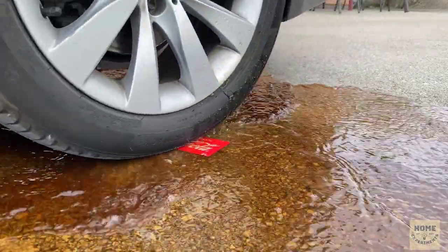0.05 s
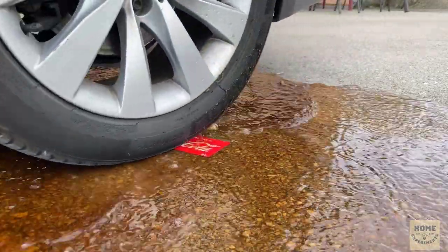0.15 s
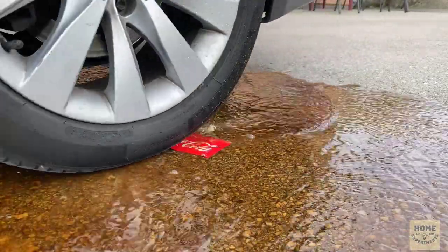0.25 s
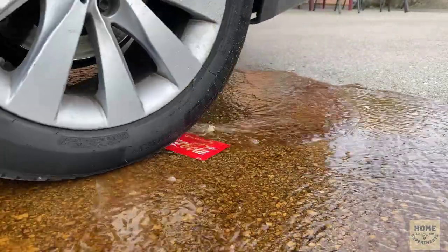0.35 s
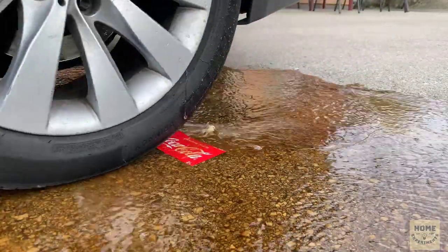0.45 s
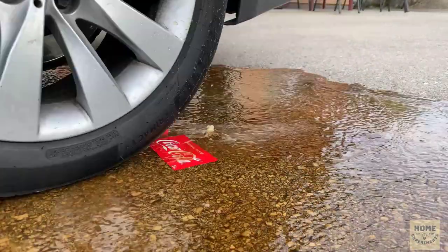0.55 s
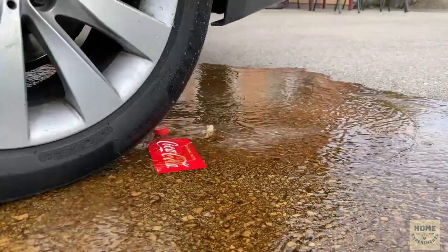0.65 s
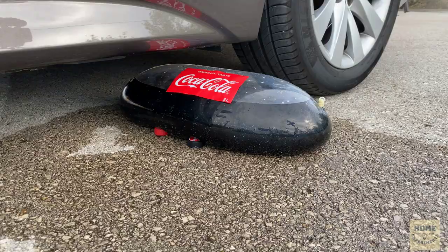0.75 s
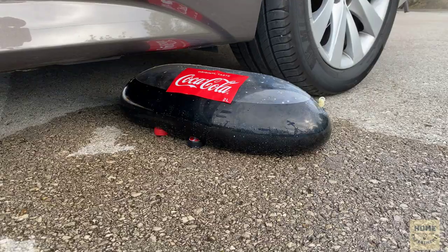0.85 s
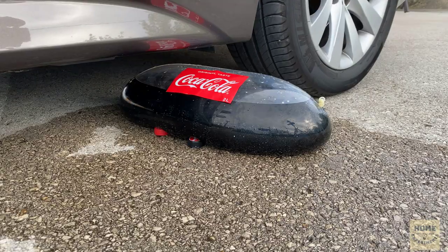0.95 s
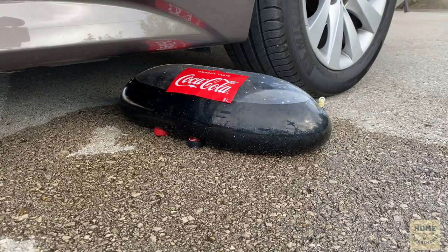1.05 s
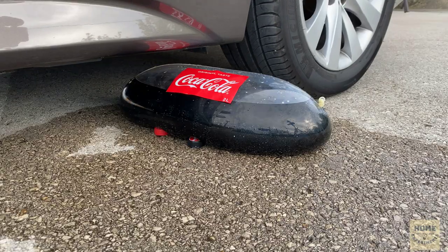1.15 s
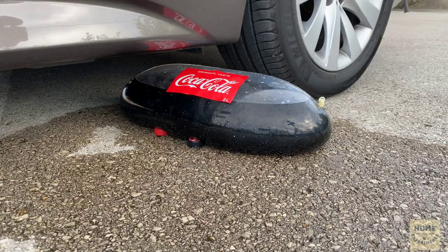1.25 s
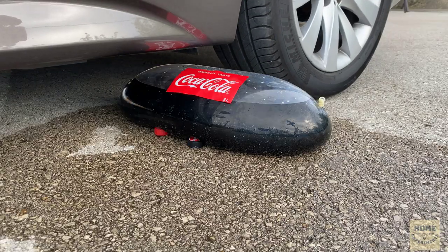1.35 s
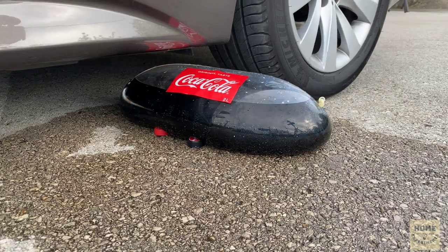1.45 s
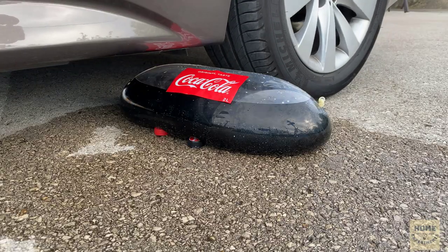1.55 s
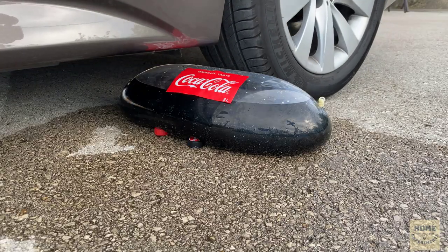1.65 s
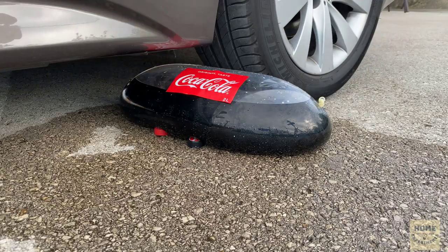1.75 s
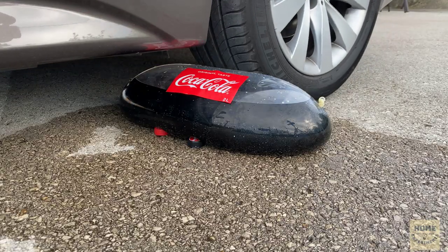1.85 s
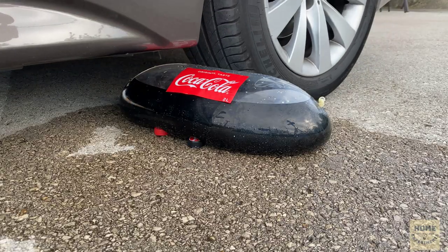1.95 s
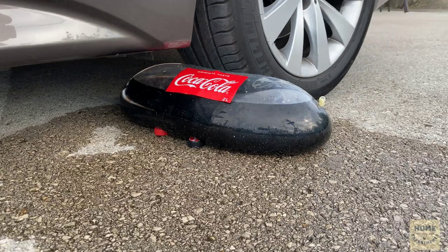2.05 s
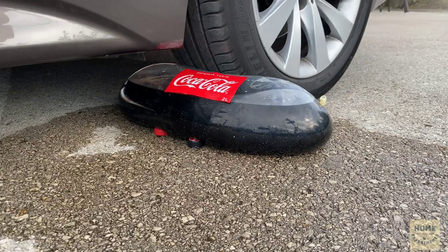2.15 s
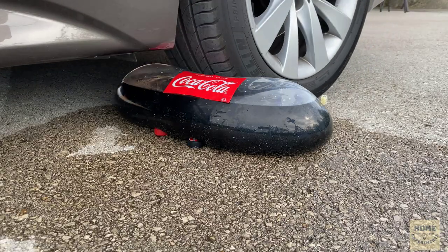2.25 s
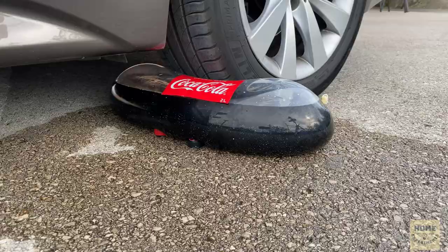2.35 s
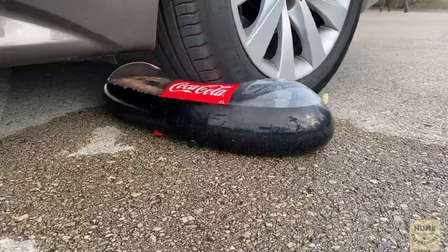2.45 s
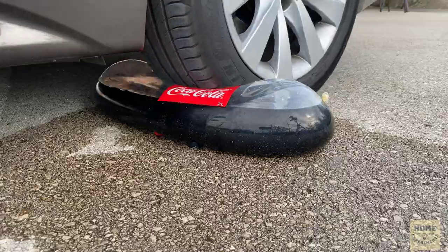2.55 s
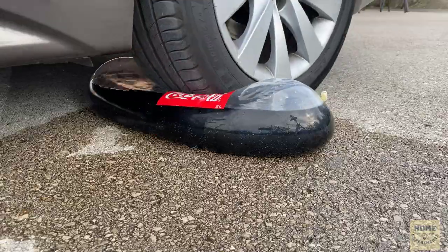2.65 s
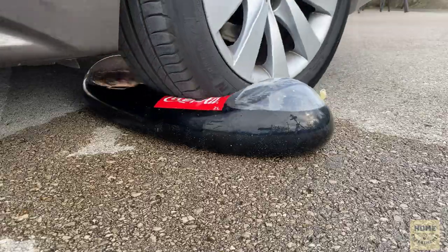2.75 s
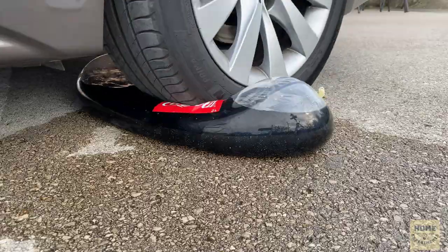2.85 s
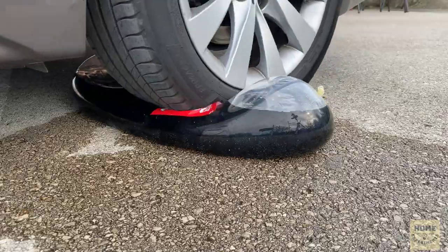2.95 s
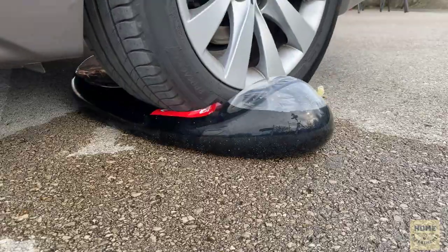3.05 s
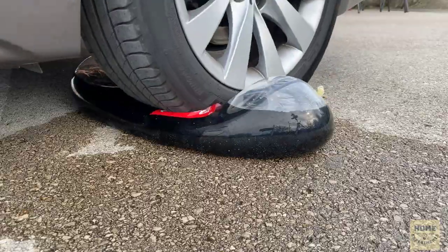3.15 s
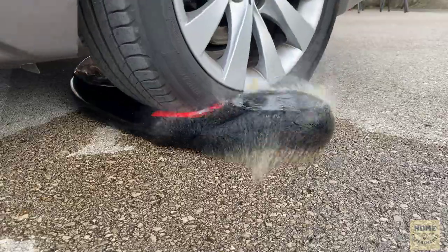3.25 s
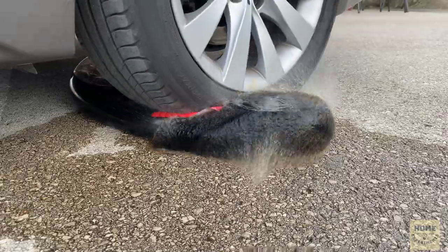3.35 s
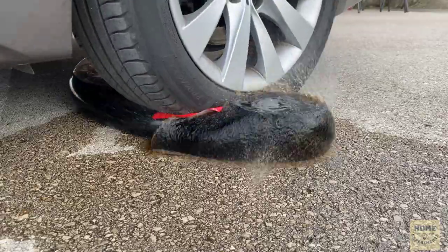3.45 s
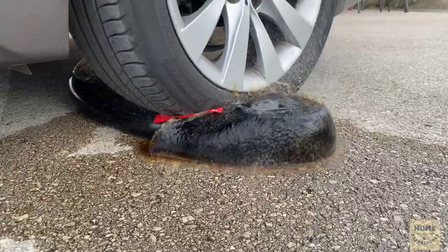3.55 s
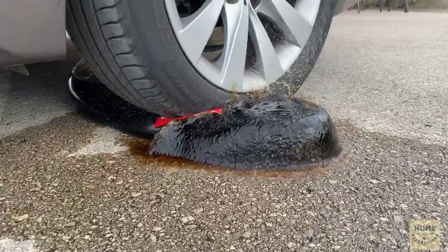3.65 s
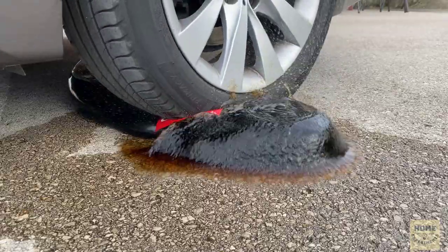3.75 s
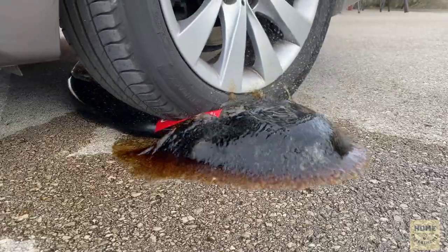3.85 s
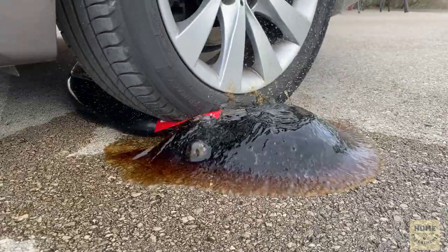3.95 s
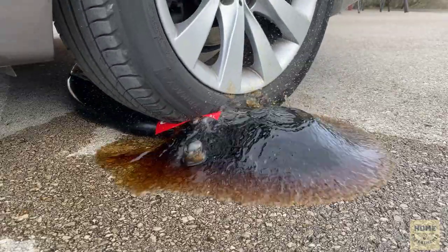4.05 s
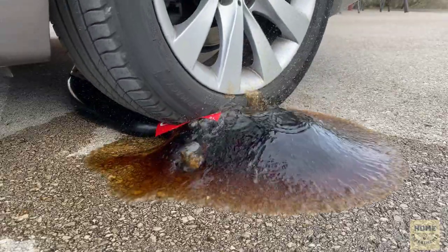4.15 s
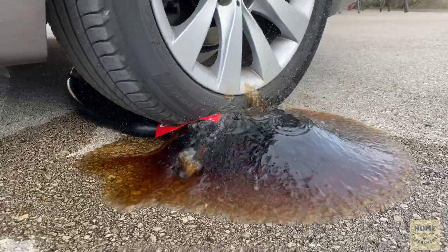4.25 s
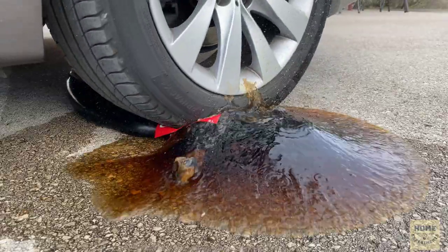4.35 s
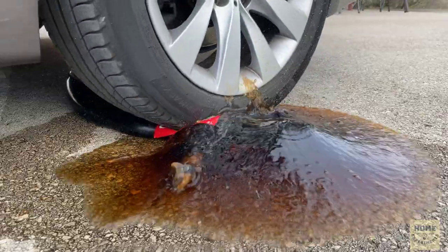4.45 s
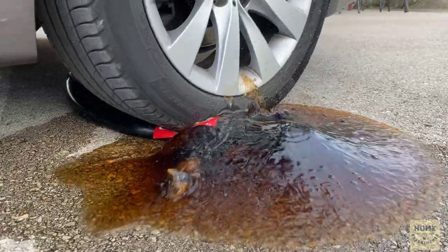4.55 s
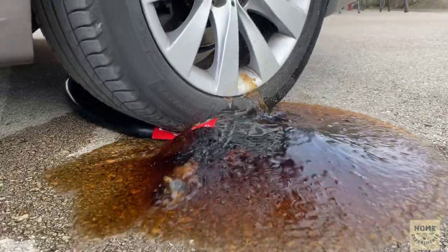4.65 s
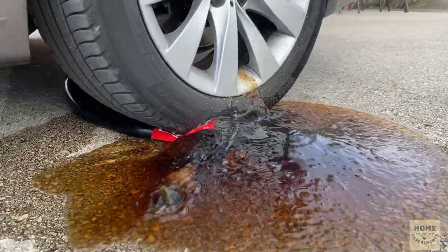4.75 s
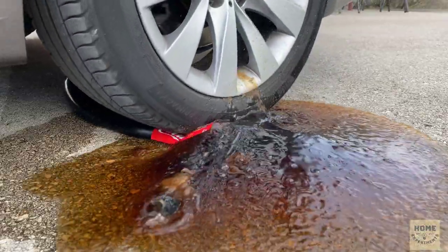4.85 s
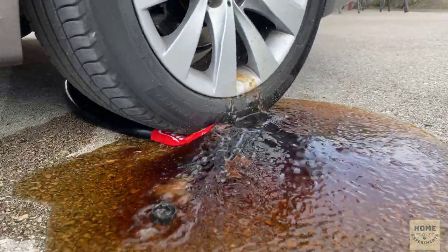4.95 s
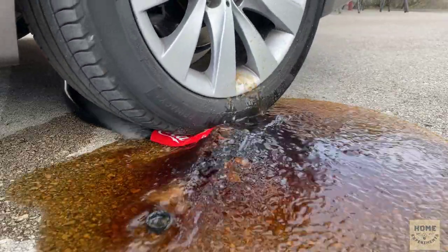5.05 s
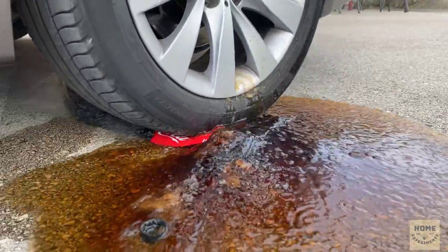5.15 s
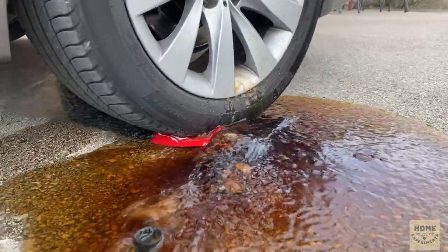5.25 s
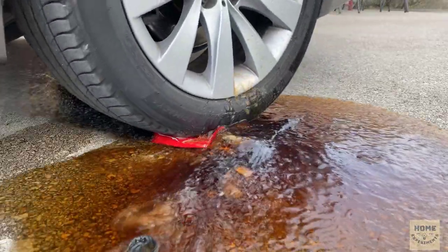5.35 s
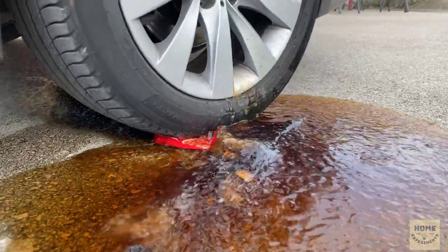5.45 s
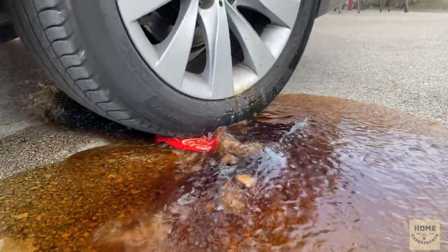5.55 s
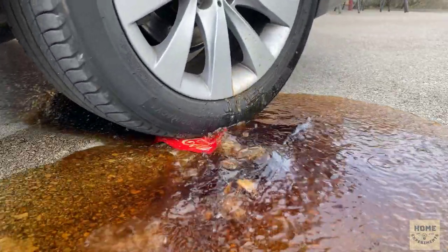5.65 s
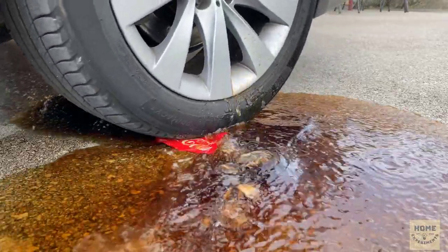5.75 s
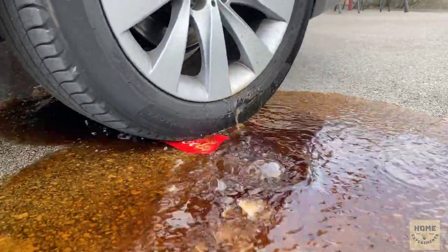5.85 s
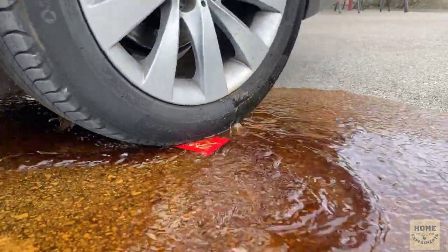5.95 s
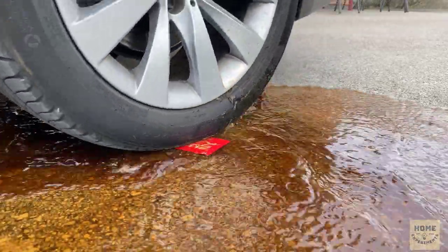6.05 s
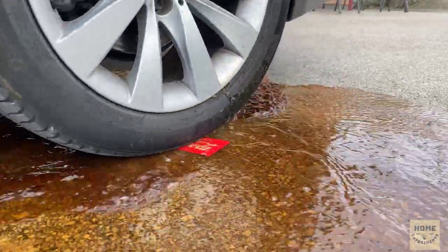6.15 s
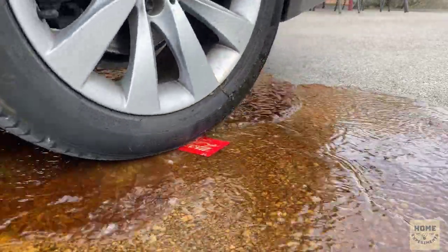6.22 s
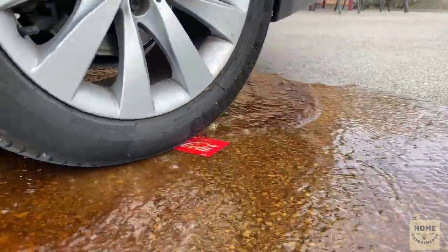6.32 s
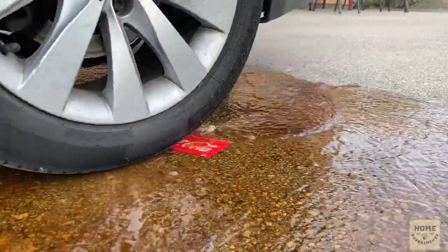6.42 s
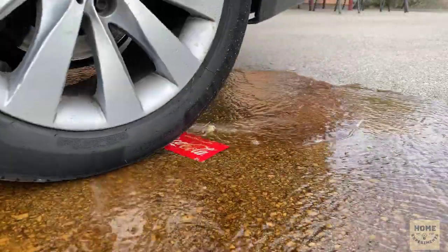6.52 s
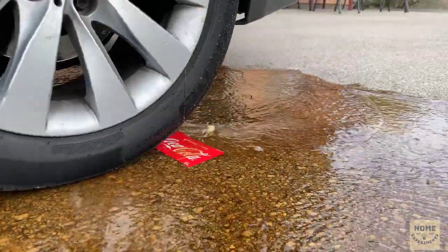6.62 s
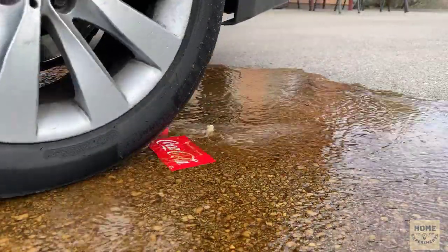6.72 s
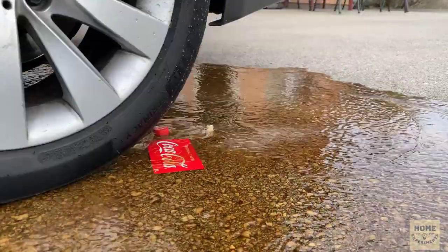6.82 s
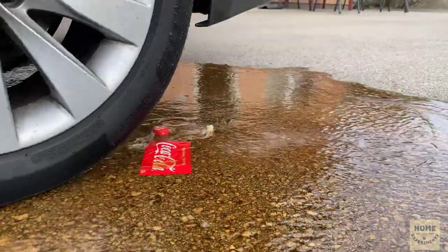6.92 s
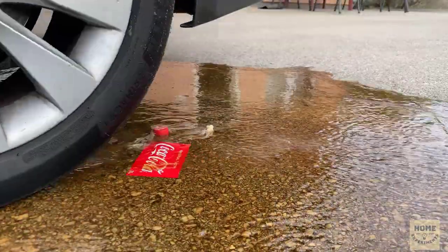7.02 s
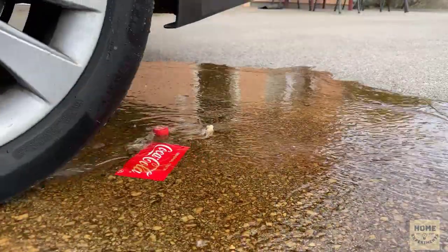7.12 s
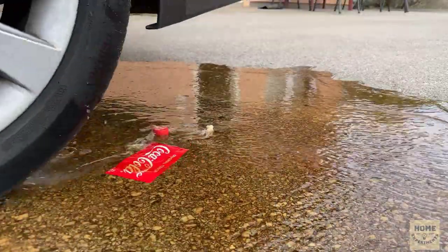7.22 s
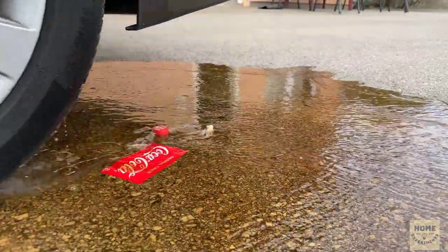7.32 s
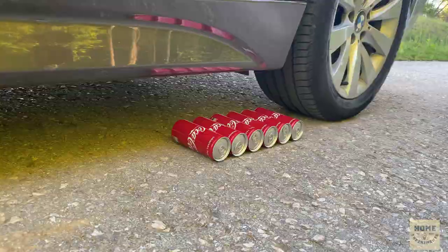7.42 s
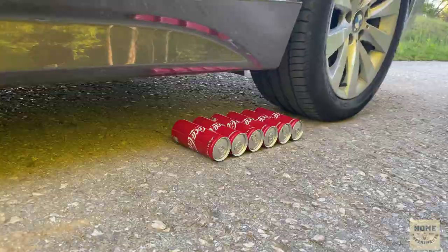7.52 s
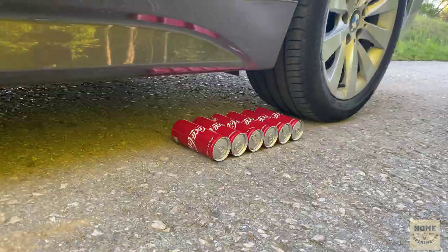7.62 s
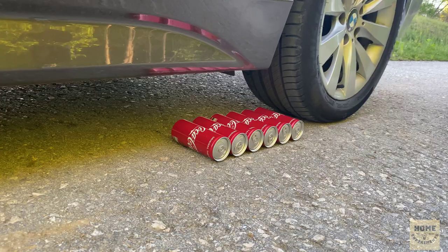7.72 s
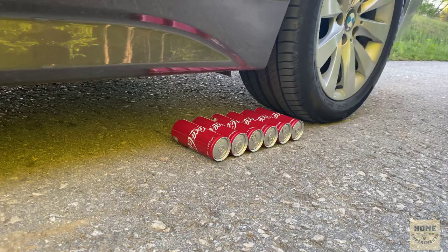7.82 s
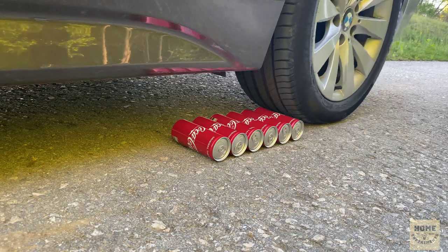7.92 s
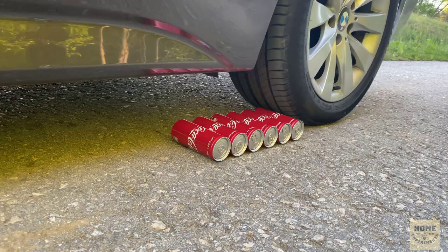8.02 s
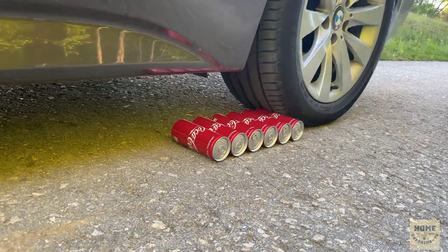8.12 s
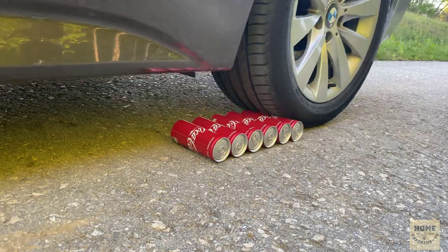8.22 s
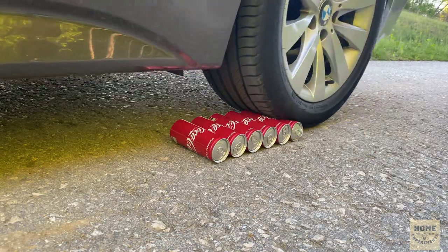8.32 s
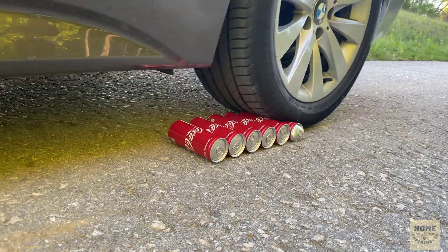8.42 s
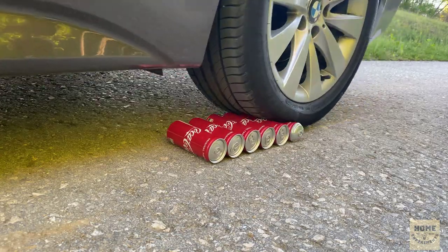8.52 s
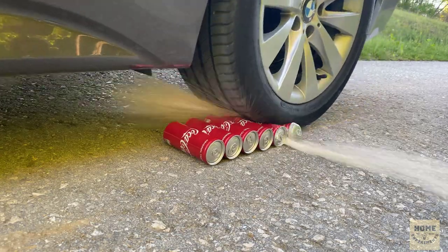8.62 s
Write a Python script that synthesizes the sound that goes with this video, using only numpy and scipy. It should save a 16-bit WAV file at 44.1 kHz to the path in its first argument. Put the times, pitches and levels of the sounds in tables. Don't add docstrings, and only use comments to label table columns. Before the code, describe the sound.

From 0 to 0.78 s a splash thins out, dense watery patter with a few clear plips, in mono, then a tiny silence. From 0.8 s a wide, quiet yard: faint wind, a distant pulsing insect, a far vehicle drone near 1.7 s, and sparse grit ticks, growing sharper as the tyre creeps closer. Rubber creaks softly around 2.7 s. At 3.1 s the liquid-filled balloon bursts with a hard bang and thump; at 3.37 s a second, softer burst releases a gurgling, spattering gush. It thins to scattered drips over tyre hiss and faint car whines. At 5.89 s the gush starts again and dies away similarly. At 7.45 s it cuts to mono low road rumble; a small scrape at 7.95 s, dull knocks from 8.03 s, then thin metal cans buckle from 8.2 s to the end in loud, bright, irregular crunching cracks.

```python
import sys
import numpy as np
from scipy import signal
from scipy.fft import rfft, irfft, next_fast_len
from scipy.io import wavfile
from scipy.ndimage import uniform_filter1d

SR = 44100
rng = np.random.default_rng(int(sys.argv[2]) if len(sys.argv) > 2 else 0)


def master_out(mix):
    frames = np.transpose(np.atleast_2d(mix))
    ceiling = np.clip(frames, -1, 1)
    pcm = np.round(ceiling * 32767).astype(np.int16)
    wavfile.write(sys.argv[1], SR, pcm)


def gain_from_db(level_db):
    decades = np.asarray(level_db, float) / 20
    return 10 ** decades


N = 382788

# start in seconds, end in seconds.
SHOTS = [
    (0, .8),
    (.79, 5.9),
    (7.4, 8.7),
]
# start in seconds, peak level in dB, strongest ring in Hz,
# level of the 400-900 Hz boom in dB.
FOLDS = [(8.1867, -23, 1270, -0.5), (8.2143, -6.5, 2900, -22), (8.2224, -4.5, 3150, -22),
         (8.2368, -10, 3100, -30), (8.2439, -7, 3460, -38), (8.2528, -2, 2960, -31), (8.2614, 0, 2400, -20),
         (8.267, -14, 2990, -12), (8.272, -13, 3000, -23), (8.276, -1.5, 3030, -7.5),
         (8.282, -23, 3100, -16), (8.288, -17, 3080, 3), (8.313, -2.5, 3170, -19.5), (8.399, 4, 2440, -8.5),
         (8.4606, -3, 1540, -7), (8.5033, -30, 2760, -7), (8.5132, -12, 2980, -20), (8.519, -25, 1640, -13),
         (8.5237, -14.5, 3400, -24), (8.5282, -18, 1240, -21), (8.555, -28, 3500, -10),
         (8.5728, -14, 3100, -25), (8.613, -22, 1900, -22), (8.6167, -14, 2740, -2.5),
         (8.6225, -12.5, 2070, -2.5), (8.6254, -17, 3830, -18), (8.6311, -21, 1360, 7.5),
         (8.6517, -11.5, 1400, 4), (8.6714, -19, 2800, -11)]
STEADY_DB = 0.5


def bursts():
    # frequency in Hz, density in dB per Hz.
    blast_tone = [(59, -12), (100, -19), (711, -11.5), (1020, -21.5), (1700, -16.5), (2150, -16.5),
                  (4170, -8.5), (5280, -18), (10000, -17), (12100, -25), (14400, -18), (16300, -41)]
    # peak time in seconds, rms level in dB, rise in seconds, t60 in seconds,
    # slosh level in dB.
    tears = [
        (3.0959, -9, 0.00058, 0.013, -34),
        (3.099, -25, 0.00039, 0.058, -31.5),
        (3.1034, -24, 0.00034, 0.01, -38),
        (3.354, -40, 0.00091, 0.21, -32.5),
        (3.3715, -23, 0.0036, 0.017, -34),
        (3.377, -13.5, 0.0043, 0.06, -14),
    ]
    refill = [(12150, 430, 30), (16200, 900, 30)]
    left, right = noise(blast_tone, SHOTS[1], STEADY_DB, size=256, bumps=refill)
    side = 1.11 * (left - right)
    blast = evened(stereo_treble(left + right + side * np.c_[[1, -1]]))
    slosh = evened(band(blast + 0.6 * blast.mean(0), 64, 1510))
    out = np.zeros((2, N))
    for s, db, rise, t60, slosh_db in tears:
        out += (gain_from_db(db) * blast + gain_from_db(slosh_db) * slosh) * swell(s, rise, t60)
        thump = gain_from_db(12 + 1.9 * db) * ring(460, 0.044, end_hz=87)
        add(out, s + 0.00126, -thump)
    return out


def fold(db, hz, boom_db, treble_db, t60):
    # frequency in Hz, level in dB, t60 in seconds.
    modes = [(1211, -20, 0.26), (1760, -11, 0.1), (2186, 14, 0.55), (2675, -20, 0.1), (3100, 8, 0.18),
             (3170, -51, 0.12), (3684, 30, 0.11), (4040, 11, 0.057), (4150, -33, 0.083), (4900, -30, 0.077)]
    n, snap_s, contact = 9000, 0.0004, 0.3
    t = np.arange(n) / SR
    slips = gain_from_db(2.2 * evened(uniform_filter1d(rng.standard_normal(n), 30)))
    fall = gain_from_db(-60 * t / (0.32 * t60)) + 0.096 * gain_from_db(-60 * t / (1.93 * t60))
    crack = rng.standard_normal(n) * slips * fall * np.minimum(t / snap_s, 1)
    wall = np.zeros(n)
    chance = rng.standard_normal((4 * len(modes), 2))
    for (f, mode_db, mode_t60), (detune, spread) in zip(4 * modes, chance):
        mode = ring(f * (1 + 0.068 * detune), contact * mode_t60)
        add(wall, 0, gain_from_db(mode_db + 7.7 * spread) * mode)
    parts = [(0.25, signal.oaconvolve(crack[:80], wall)[:n]),
             (0.4, resonate(crack, hz, 920)),
             (0.7, band(crack, 0.41 * hz, 8700)),
             (gain_from_db(boom_db), resonate(crack * fall, 763, 670)),
             (gain_from_db(treble_db), band(crack, 6900, 15700))]
    return gain_from_db(db) * sum(gain * part / abs(part).max() for gain, part in parts)


def folds():
    out = np.zeros(N)
    for s, db, hz, boom_db in FOLDS:
        treble_db = -9 - 10 * (s - FOLDS[0][0])
        add(out, s, fold(db, hz, boom_db, treble_db, t60=0.057))
    return out


def crinkle():
    # peak time in seconds, level in dB, build-up in seconds.
    yields = [
        (8.063, -43, .004),
        (8.159, -61, 0.018),
        (8.225, -48, 0.0073),
        (8.281, -17, 0.02),
        (8.415, -24, 0.0024),
        (8.52, -23.5, 0.0026),
        (8.62, -17, 0.0043),
        (8.68, -32, 0.0077),
    ]
    snaps = rng.standard_normal(N) * gain_from_db(4 * np.minimum(rng.exponential(1, N), 3.5))
    snaps *= rng.random(N) < 8000 / SR
    folding = np.arange(N) > FOLDS[0][0] * SR
    rung = evened(band(snaps, 1250, 4000) + 0.18 * band(snaps, 3400, 19200) * folding)
    return rung * sum(gain_from_db(db) * swell(s, rise, t60=0.055) for s, db, rise in yields)


def knock(hz, t60, rough):
    clean = ring(hz, t60)
    n = np.arange(len(clean))
    rise = 1 - np.exp(-n / SR / 0.00051)
    fuzz = evened(resonate(rng.standard_normal(SR), hz, 1.22 * hz))[-len(clean):]
    smear = 1.5 * fuzz * gain_from_db(-60 * n / len(clean))
    return rise * ((1 - rough) * clean + rough * smear)


def can_knocks():
    # start in seconds, peak level in dB, frequency in Hz.
    thuds = [(8.032, -21.5, 142), (8.062, -31.5, 888), (8.087, -10.5, 237.8), (8.153, -32.5, 1480),
             (8.275, -11, 241.4), (8.277, -14, 1044), (8.398, -16.5, 226), (8.3982, -7, 804),
             (8.462, -11, 264), (8.556, -29, 750), (8.613, -14, 267), (8.615, -14.5, 789), (8.65, -11, 754),
             (8.651, -12.5, 1443), (8.4, -32, 7870), (8.46, -30, 5830), (8.3983, -12.5, 412)]
    # start in seconds, peak level in dB, frequency in Hz, t60 in seconds.
    free_walls = [
        (8.1, -32, 235, 0.25),
        (8.214, -27.5, 1225, 0.31),
        (8.3, -34, 1211, .4),
        (8.318, -26.5, 2186, 0.1),
        (8.41, -31.5, 439.5, .9),
    ]
    out = np.zeros(N)
    for s, db, hz in thuds:
        add(out, s, gain_from_db(db) * knock(hz, 0.035 + 8 / hz, rough=min(hz / 2800, 1)))
    for s, db, hz, t60 in free_walls:
        add(out, s, gain_from_db(db) * knock(hz, t60, rough=0.22))
    return out


def can_friction():
    # time in seconds, level in dB, frequency in Hz.
    cavity = [(8.031, -35.5, 175), (8.066, -38.5, 196), (8.11, -30, 242), (8.15, -36, 244),
              (8.19, -40, 281), (8.216, -49, 278), (8.3, -34, 234), (8.34, -45, 198), (8.389, -63, 220),
              (8.41, -35, 230), (8.45, -35, 216), (8.5, -39, 215), (8.535, -33.5, 270), (8.545, -32.5, 229),
              (8.56, -34, 240), (8.6, -32.5, 209), (8.66, -37, 290), (8.68, -41, 300)]
    # time in seconds, level in dB, frequency in Hz.
    scrape = [(7.943, -57, 520), (7.95, -37.5, 557), (7.965, -41, 510), (7.99, -53, 450), (8.0, -58, 450)]
    # time in seconds, level in dB, frequency in Hz.
    creak = [(8.028, -62, 1200), (8.035, -46, 1200), (8.055, -49, 1100), (8.063, -39, 850),
             (8.08, -49, 700), (8.1, -46, 700), (8.14, -56, 900), (8.156, -42, 1560), (8.175, -40, 1100),
             (8.19, -42, 1190), (8.215, -45, 1290)]
    return hum(cavity, 116) + hum(scrape, 290) + hum(creak, 1200)


def bubble(hz, end_hz, length):
    u = np.arange(int(length * SR)) / (length * SR)
    wobble = evened(uniform_filter1d(rng.standard_normal((2, 4000)), 120))[:, :len(u)]
    pitch = (hz + (end_hz - hz) * u ** 1.23) * (1 + 0.08 * wobble[0])
    loudness = np.sin(np.pi * u ** 0.46) * (1 + 0.42 * wobble[1])
    return loudness * np.sin(2 * np.pi * np.cumsum(pitch) / SR)


def bubbles():
    # start in seconds, peak level in dB, start frequency in Hz,
    # end frequency in Hz, length in seconds.
    cavities = [(2.9, -64, 305, 790, 0.044), (3.192, -51, 440, 1150, .04), (3.307, -41, 413, 660, 0.058),
                (3.417, -32.5, 276, 480, 0.032), (3.439, -35, 456, 477, 0.043),
                (3.448, -29.5, 106, 156, 0.075), (3.455, -35.5, 750, 920, 0.035),
                (3.497, -42, 214.6, 406, 0.064), (3.518, -33, 442, 1400, 0.0357),
                (3.668, -44, 530, 493, 0.037), (3.613, -44, 850, 650, 0.033),
                (3.64, -42.5, 950, 1010, 0.05), (3.3, -31, 1260, 1800, 0.0075),
                (3.541, -30, 1300, 2300, 0.013), (3.505, -39.5, 307, 472, 0.0496),
                (3.47, -38, 710, 1200, 0.036), (0.43, -52, 600, 1250, 0.021),
                (0.045, -46, 626, 1300, 0.036), (0.463, -43, 420, 402, 0.043),
                (0.00607, -44, 840, 1700, 0.084)]
    # start in seconds, peak level in dB, frequency in Hz.
    pops = [(3.26, -45, 670), (3.549, -27, 1850), (3.548, -29.5, 890), (3.582, -35, 1066),
            (3.614, -39, 1080), (3.644, -39, 1150), (3.775, -44, 820), (3.9, -38.5, 1127),
            (3.941, -37, 1940)]
    out, froth = np.zeros((2, N))
    for s, db, hz, end_hz, length in cavities:
        add(out, s, gain_from_db(db) * bubble(hz, end_hz, length))
    for s, db, hz in pops:
        add(out, s, gain_from_db(db) * bubble(hz, 1.15 * hz, 0.011))
        add(out, s, tick(db - 2, 1.56 * hz, cycles=3, puff=2.7, wide=2))
    for when, pitch, glide, loud in rng.random((340, 4)):
        hz = 280 * (1 + 1.51 * when) * 5 ** pitch
        small = bubble(hz, hz * (1 + 0.63 * glide), 12.1 / hz)
        add(froth, 2.7 + 0.93 * when, gain_from_db(-14 * loud) * small)
    return out + gain_from_db(2) * spray_level() * froth


def spray_level():
    # time in seconds, level in dB.
    flows = [
        [(3.11, -44.5), (3.16, -62), (3.24, -56.5), (3.27, -52), (3.35, -46)],
        [(3.4, -41.5), (3.46, -48.5), (3.53, -44.5), (3.58, -50), (3.68, -47), (3.73, -52.5), (3.97, -57),
         (4.4, -66.5)],
    ]
    return level(flows[0]) + level(flows[1])


def spray():
    # frequency in Hz, density in dB per Hz.
    spray_tone = [(150, -41), (400, -7), (1000, 14), (2000, 3), (3400, 13), (5000, 9.5), (8000, 2.5),
                  (15500, -1.5)]
    wash = noise(spray_tone, SHOTS[1], patchy_db=2.4, grain_db=2, size=256)
    drops = np.array([droplets((3.1, 4.4), count=520) for port in "LR"])
    return spray_level() * (gain_from_db(3.5) * wash + gain_from_db(-8.5) * drops)


def droplets(span, count):
    out = np.zeros(N)
    for when, pitch, loud, cycles in rng.random((count, 4)):
        hz = 2300 * 2.7 ** pitch
        drop = bubble(hz, 1.116 * hz, (3 + 14 * cycles ** 2) / hz)
        s = span[0] + (span[1] - span[0]) * when ** 2
        add(out, s, (loud + 0.0087) ** -0.45 * drop)
    return evened(out)


def landing_drops():
    # start in seconds, peak level in dB, frequency in Hz.
    landings = [(3.217, -43, 6200), (3.2575, -38, 4600), (3.3139, -34, 2930), (3.3378, -46, 3350),
                (3.4417, -38, 4720), (3.4715, -38, 3730), (3.4712, -31, 9800), (3.531, -27.5, 3800),
                (3.537, -41, 3320), (3.571, -45, 5000), (3.6068, -30, 4210), (3.6205, -50, 3250),
                (3.652, -37, 3100), (3.6694, -40, 7000), (3.6812, -29, 3860), (3.74, -39, 5240),
                (3.7966, -39, 6360), (3.8164, -41, 5030), (3.8872, -48, 4400), (3.899, -45, 3100),
                (3.972, -43.5, 3000), (4.138, -43.5, 2270), (4.2, -44, 3450), (4.2549, -47, 4430),
                (4.3413, -44.5, 10000), (4.48, -51, 3260), (4.8656, -45.5, 3520), (4.9297, -42.5, 9160),
                (4.94, -41.5, 3360), (5.015, -48, 2520), (5.0694, -57, 5530), (5.485, -50, 5000),
                (5.525, -48, 3100), (5.59, -45, 3500), (5.6251, -51, 5860), (5.672, -45, 9500),
                (5.7, -46, 2895), (5.826, -45, 2940), (5.8651, -48, 8380)]
    out = np.zeros((2, N))
    for s, db, hz in landings:
        drop = tick(db, hz, cycles=9, puff=0.64, wide=1.8, puff_s=0.0035, spike=3.8)
        add(out, s, placed(drop, left_db=9 * np.tanh((s - 3.4) / 0.25)))
    return out


def grit():
    # start in seconds, peak level in dB,
    # frequency in Hz.
    cracks = [(.825, -58, 2240), (0.842, -56.5, 2500), (1.11, -51, 1730), (1.126, -57, 2000),
              (1.236, -62, 2000), (1.815, -62, 5800), (1.434, -49.5, 1760), (1.5834, -54.5, 1720),
              (1.64, -54.5, 1930), (1.684, -55.5, 1690), (1.7743, -52, 4900), (1.854, -61, 5570),
              (2.07, -52, 8000), (2.1, -50, 8500), (2.14, -60, 8000), (2.18, -57, 9000), (2.2, -57, 9500),
              (2.212, -60, 8500), (2.375, -56, 7000), (2.2414, -53, 5150), (2.281, -49, 10100),
              (2.302, -48.5, 4670), (2.334, -48, 5250), (2.622, -46, 3660), (2.659, -50, 1140),
              (2.693, -43, 1190), (2.708, -35.5, 4900), (2.802, -39.5, 4470), (2.879, -47, 4700),
              (2.9408, -32, 9650)]
    insect_hz = 4750
    out = np.zeros((2, N))
    for s, db, hz in cracks:
        wide = 2.2 + 2.2 * max(s - 2, 0)
        left_db = -8.5 if abs(hz / insect_hz - 1) < 0.1 else 4.5
        add(out, s, placed(tick(db, hz, cycles=5, puff=1.4, wide=wide), left_db))
    return out


def tick(db, hz, cycles, puff, wide=1.66, puff_s=0.0046, spike=0.):
    t = np.arange(600) / SR
    hit = rng.standard_normal(600) + spike * (np.arange(600) == 20)
    x = puff * band(hit, 0.3 * hz, wide * hz) * np.exp(-t / puff_s)
    add(x, 0, ring(hz, cycles / hz + 3.4 * puff_s))
    x = x * np.minimum(t / 0.00054, 1)
    return gain_from_db(db) * x / abs(x).max()


def creaks_and_tones():
    # time in seconds, level in dB, frequency in Hz.
    squeeze = [(2.55, -85, 800), (2.63, -66, 754), (2.7, -59, 800), (2.76, -68, 800), (2.9, -76, 750)]
    # time in seconds, level in dB, frequency in Hz.
    lead_tones = [
        [(3.077, -78, 5700), (3.082, -59, 5700), (3.094, -53, 5700)],
        [(3.077, -78, 7850), (3.082, -60, 7850), (3.094, -53, 7850)],
        [(3.08, -75, 1900), (3.088, -60, 1900), (3.094, -54, 1900)],
    ]
    return hum(squeeze, 780) + sum(hum(lead_tone, 120) for lead_tone in lead_tones)


def tyre_hiss():
    # time in seconds, level in dB.
    hiss = [(1.97, -94), (2.02, -76), (2.08, -74), (2.45, -69.5), (3.09, -68.5), (3.39, -62), (5.9, -65.5)]
    # frequency in Hz, density in dB per Hz.
    hiss_tone = [(88, -49), (150, -7), (291, -8.5), (368, -1), (601, -3), (730, -8), (923, -10.5),
                 (1210, -14), (2270, -12), (5050, -11), (8230, -16.5), (9820, -13.5), (12200, -18.5),
                 (15500, -16)]
    # frequency in Hz, width in Hz, level in dB.
    car_modes = [(611, 43, -16), (903, 51, 8), (1114, 32.4, -4), (1720, 9.2, -22), (2290, 49, -21),
                 (3250, 88, -29), (3500, 45, -1), (4726, 42, -15)]
    bumps = raised(car_modes, db=11)
    return gain_from_db(10) * level(hiss) * noise(hiss_tone, SHOTS[1], 1, grain_db=2, size=2048, bumps=bumps)


def whines():
    # time in seconds, level in dB, frequency in Hz.
    drifts = [
        [(3.9, -75, 2370), (4.35, -76, 2307), (5.0, -72.5, 2323), (5.15, -85, 2280), (5.35, -73, 2214),
         (5.9, -78, 2230)],
        [(3.9, -104, 3370), (4.45, -79, 3320), (4.7, -74, 3170), (4.95, -71.5, 3240), (5.1, -80, 3210),
         (5.9, -71, 3180)],
        [(4.55, -90, 3560), (4.78, -77, 3580), (4.9, -70, 3640), (5.1, -85, 3620)],
    ]
    return gain_from_db(2.5) * sum(hum(drift, 48) for drift in drifts)


def road():
    # time in seconds, level in dB.
    rumble = [(7.44, -52.5), (8.02, -52), (8.1, -47.5), (8.4, -51.5), (8.68, -38.5)]
    # frequency in Hz, density in dB per Hz.
    road_tone = [(18, -64), (30, -14), (90, 4.5), (319, -1.5), (584, -2), (1040, -7.5), (1130, -5.5),
                 (1540, -7), (1720, -4.5), (1860, -4), (4190, -6), (4910, -10), (14400, -34),
                 (16000, -44.5)]
    # frequency in Hz, width in Hz, level in dB.
    car_modes = [(592, 46, -5), (1110, 48, 7), (1690, 93, -6), (2160, 36, 6), (2280, 19, 0),
                 (3260, 34, -16), (3660, 34, -6), (4300, 110, 3)]
    bumps = raised(car_modes, db=8) + [(5540, 670, -2.2)]
    return gain_from_db(3.5) * level(rumble) * noise(road_tone, SHOTS[2], STEADY_DB, size=2048, bumps=bumps)[0]


def wind():
    # centre in seconds, peak level in dB,
    # half length in seconds.
    gusts = [(0.985, -75, 0.02), (1.267, -64, 0.11), (1.764, -66, 0.083), (2.144, -59, 0.038),
             (2.6, -66.5, 0.97), (3.117, -38, 0.032), (3.33, -47.5, 0.088), (3.389, -36, 0.027),
             (2.38, -78, 0.095), (4.816, -60, 0.17), (5.84, -60, 0.071), (3.62, -61.5, 0.15),
             (4.083, -59, 0.13), (4.53, -68.5, 0.17), (5.3, -60, 0.65)]
    # frequency in Hz, density in dB per Hz.
    wind_tone = [(12, -49), (20, -36), (36, -17), (70, 9.5), (133, -4), (221, -11), (300, -14), (390, -36),
                 (660, -120)]
    lull_db, cap_db = -71, -34
    t = np.arange(N) / SR
    loudness = gain_from_db(lull_db) + sum(gain_from_db(db) * np.exp(-((t - s) / half) ** 2) for s, db, half in gusts)
    return np.minimum(loudness, gain_from_db(cap_db)) * noise(wind_tone, SHOTS[1], patchy_db=2.4, size=2048)


def yard():
    # frequency in Hz, density in dB per Hz.
    yard_tone = [(88, -15.5), (150, 1), (249, -25), (446, -1.5), (516, -12.5), (1190, -20.5), (1650, -20.5),
                 (4090, -18.5), (4720, -11), (5170, -28), (8290, -32), (10100, -37.5), (11500, -59),
                 (15000, -64), (22000, -120)]
    # time in seconds, level in dB, frequency in Hz.
    drone = [(1.6, -91, 680), (1.68, -70, 647), (1.8, -73.5, 607), (1.95, -73.5, 580), (2.02, -101, 590)]
    # time in seconds, level in dB, frequency in Hz.
    traffic = [(4.9, -72, 1920), (5.9, -63, 1930)]
    floor = gain_from_db(-67.5) * noise(yard_tone, SHOTS[1], 2.4, grain_db=1.4)
    return floor + hum(drone, 68) + hum(traffic, 1250)


def insect():
    chirps_per_s, trains_per_s = 25.3, 3.08
    t = np.arange(N) / SR - 0.885
    chirps = 6 * np.cos(2 * np.pi * chirps_per_s * t)
    trains = 4 * np.cos(2 * np.pi * trains_per_s * t)
    flutter = 2.5 * evened(uniform_filter1d(rng.standard_normal(N), 1200))
    tone = evened(resonate(rng.standard_normal((2, N)), 4750, 150))
    return gain_from_db(-78) * gain_from_db(flutter + chirps + trains) * tone


def mic_hiss():
    return gain_from_db(-92) * band(rng.standard_normal((2, N)), 110, 6800)


def stereo_treble(x):
    # frequency in Hz, width in Hz, depth in dB.
    dips = [(8250, 90, -20), (12150, 430, -45), (16200, 900, -40)]
    turn_hz, same, lag = 8000, 0.83, 11
    size = next_fast_len(N)
    left, right = rfft(x, size)
    hz = np.fft.rfftfreq(size, 1 / SR)
    high = np.clip((hz - turn_hz) / 500, 0, 1)
    both, apart = (left + right) / np.sqrt(2), (left - right) / np.sqrt(2)
    turned = np.sqrt(1 - same ** 2) * apart - same * both * np.exp(-2j * np.pi * hz * lag / SR)
    holes = gain_from_db(sum(d * np.exp(-((hz - f) / w) ** 4) for f, w, d in dips))
    heard = (1 - high) * np.array([left, right]) + high * np.array([turned, both])
    return irfft(heard * holes, size)[:, :N]


def noise(tone, span, patchy_db, grain_db=0., size=512, bumps=()):
    # frequency in Hz, coherence from 0 to 1.
    likeness = [(60, 0.98), (200, 0.95), (600, 0.45), (1600, 0.045), (5000, 0.073), (15000, 0.08)]
    right_late = 0.000466
    start, end = (round(s * SR) for s in span)
    n = min(end, N) - start
    grains = np.minimum(rng.exponential(1, n // 16 + 1), 6).repeat(16)[:n]
    drive = rng.standard_normal((2, n)) * gain_from_db(grain_db * grains)
    hz, t, (a, b) = signal.stft(drive, SR, nperseg=size)
    same = np.clip(read(likeness, hz), -1, 1)[:, None]
    late = np.exp(-2j * np.pi * hz * right_late)[:, None]
    patches = evened(uniform_filter1d(uniform_filter1d(rng.standard_normal(a.shape), 6, 0), 6, 1))
    db = read(tone, hz) + sum(d * np.exp(-((hz - f) / w) ** 4) for f, w, d in bumps)
    pair = np.array([a, same * late * a + np.sqrt(1 - same ** 2) * b])
    z = pair * gain_from_db(db[:, None] + patchy_db * patches)
    sound = evened(signal.istft(z, SR, nperseg=size)[1][:, :n])
    return np.pad(sound, ((0, 0), (start, N - start - n)))


def hum(rows, width_hz):
    s, db, hz = np.transpose(rows)
    path = np.interp(np.arange(N) / SR, s, hz)
    return level(np.c_[s, db]) * evened(resonate(rng.standard_normal(N), path, width_hz))


def resonate(x, hz, width_hz):
    turn = np.exp(2j * np.pi * np.cumsum(hz * np.ones(x.shape[-1])) / SR)
    r = np.exp(-np.pi * width_hz / SR)
    return 2 * (turn * signal.lfilter([(1 - r) ** 2], [1, -2 * r, r * r], x / turn)).real


def ring(hz, t60, end_hz=None, glide_s=0.00274):
    t = np.arange(int(t60 * SR) + 8) / SR
    glide = hz if end_hz is None else end_hz + (hz - end_hz) * np.exp(-t / glide_s)
    return np.sin(2 * np.pi * np.cumsum(glide + 0 * t) / SR) * gain_from_db(-60 * t / t60)


def band(x, lo_hz, hi_hz):
    sos = signal.butter(2, [lo_hz, min(hi_hz, SR / 2.2)], "band", fs=SR, output="sos")
    return signal.sosfilt(sos, x)


def swell(s, rise, t60):
    t = np.arange(N) / SR - s
    return np.where(t < 0, np.exp(np.minimum(t, 0) / rise), gain_from_db(-60 * np.maximum(t, 0) / t60))


def raised(peaks, db):
    return [(f, 0.36 * w, db + 0.2 * d) for f, w, d in peaks]


def placed(sound, left_db):
    return sound * gain_from_db([[left_db / 2], [-left_db / 2]])


def evened(x):
    return x / np.sqrt(np.mean(x ** 2) + 1e-20)


def read(points, hz):
    f, value = np.transpose(points)
    return np.interp(np.log(hz + 1), np.log(f + 1), value)


def level(rows):
    s, db = np.transpose(rows)
    return gain_from_db(np.interp(np.arange(N) / SR, s, db, -150, -150))


def add(mix, s, sound):
    part = mix[..., max(round(s * SR), 0):][..., :sound.shape[-1]]
    part += sound[..., :part.shape[-1]]


def spill_shot(gurgle):
    # time in seconds, level in dB.
    spill = [
        (0.0, -48),
        (0.608, -52),
        (0.78, -53.5),
    ]
    # frequency in Hz, density in dB per Hz.
    spill_tone = [(24, -45), (40, -20), (85, 4.5), (433, 0.5), (529, 11), (600, 23), (715, -1.5), (942, 7),
                  (1440, 1.5), (3470, 6), (13100, -9.5), (16000, -14)]
    # start in seconds, peak level in dB, frequency in Hz.
    clear_drops = [(0.0348, -31, 5150), (0.057, -26.5, 1330), (.0795, -34, 5500), (.146, -31, 6500),
                   (.297, -42, 7500), (0.332, -38, 7000), (0.3844, -37, 3570), (.538, -45, 3550),
                   (0.58, -42, 3500), (0.12, -33, 3170), (0.184, -34, 3040), (0.242, -29.5, 3100),
                   (0.38, -34, 3140), (0.4215, -24.5, 2750), (0.452, -37, 980), (0.468, -33, 1000),
                   (.006, -39, 4100), (.018, -31, 1500), (.225, -38, 1890), (.272, -36, 4200),
                   (0.356, -40, 2100), (.484, -37, 3740), (0.494, -37, 1790), (.493, -35.5, 950)]
    wash = noise(spill_tone, SHOTS[0], patchy_db=1, grain_db=2, size=256)[0]
    dense = droplets(SHOTS[0], count=560)
    out = level(spill) * (gain_from_db(2) * wash + gain_from_db(-12) * dense) + gurgle
    for s, db, hz in clear_drops:
        add(out, s, tick(db, hz, cycles=1.9, puff=0.9, wide=1.8, puff_s=0.0023, spike=5.4))
    return out


def balloon_shot(gurgle):
    out = spray() + creaks_and_tones() + tyre_hiss() + whines() + wind() + yard() + insect()
    out *= gain_from_db([[1.5], [-1.5]])
    out += grit() + landing_drops()
    gurgle = np.array([gurgle, np.roll(gurgle, 11)]) * gain_from_db([[1.7], [-1.7]])
    return stereo_treble(out + gurgle) + band(bursts(), 53, 19000)


def cans_shot():
    return band(folds() + crinkle() + can_knocks() + can_friction() + road(), 70, 12700)


def scene():
    edits = 0.778, 0.799, 3.4537, 5.887, 7.446
    spill_end, balloon, gush, replay, cans = (round(s * SR) for s in edits)
    gurgle = bubbles()
    out = balloon_shot(gurgle) + mic_hiss()
    n = cans - replay
    fade = np.minimum(np.arange(n) / (0.004 * SR), 1)
    tail = np.resize(out[:, replay - 400:replay], (2, n))
    out[:, replay:cans] = fade * out[:, gush:gush + n] + (1 - fade) * tail
    out[:, :spill_end] = spill_shot(gurgle)[:spill_end]
    out[:, spill_end:balloon] = 0
    out[:, cans:] = cans_shot()[cans:]
    return out


def band_limit(x):
    return signal.sosfilt(signal.butter(12, 16480, fs=SR, output="sos"), x)


def record(dry):
    mix = np.clip(dry, -1, 1)
    return band_limit(mix)


dry = scene()
out = record(dry)
master_out(out)
```